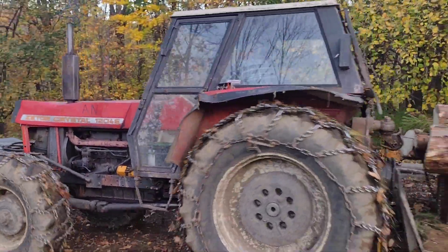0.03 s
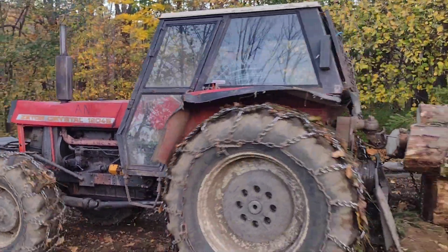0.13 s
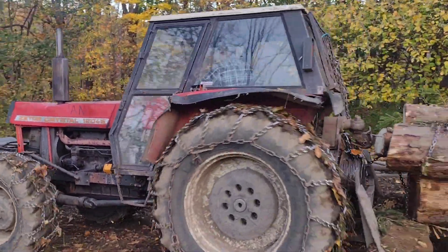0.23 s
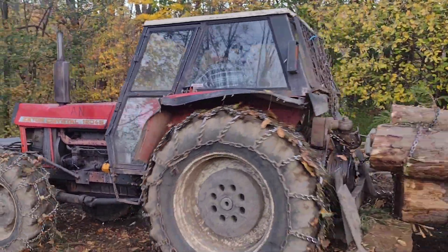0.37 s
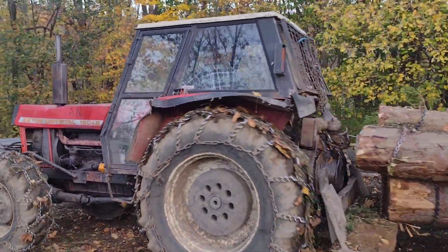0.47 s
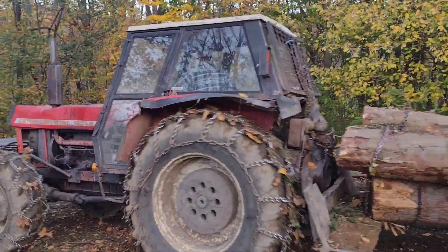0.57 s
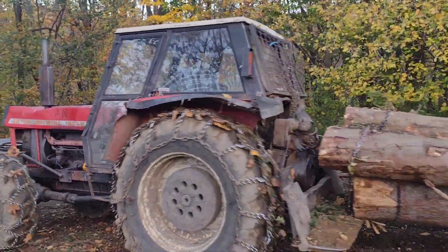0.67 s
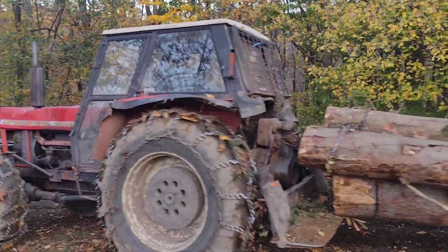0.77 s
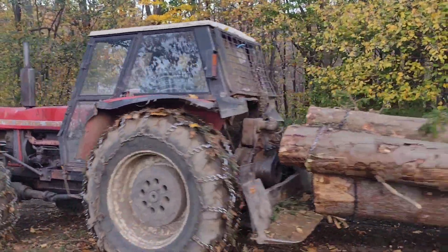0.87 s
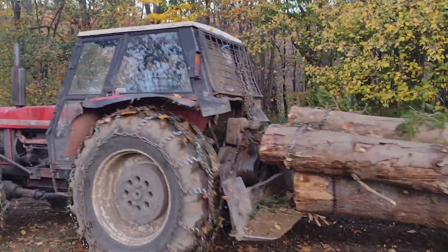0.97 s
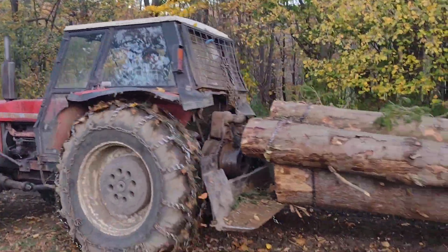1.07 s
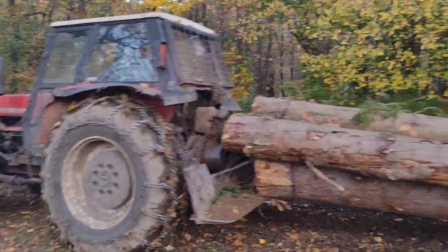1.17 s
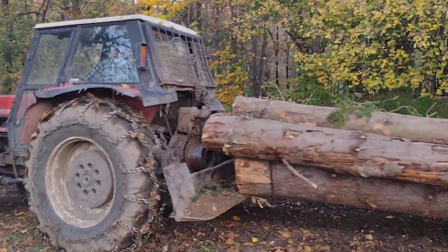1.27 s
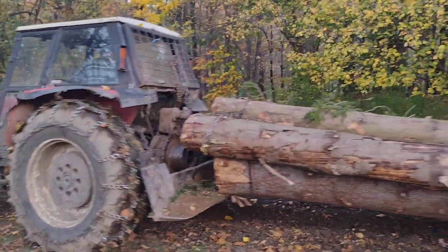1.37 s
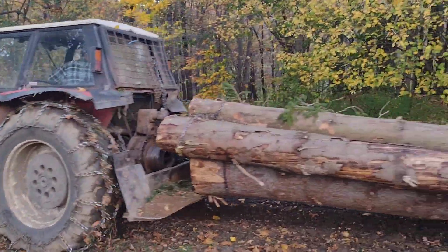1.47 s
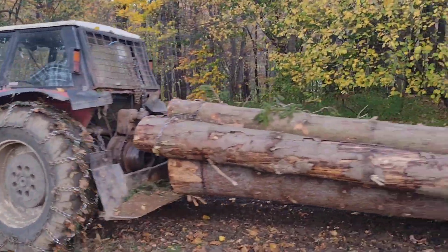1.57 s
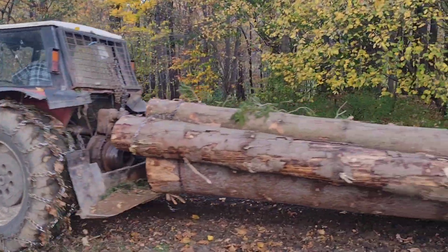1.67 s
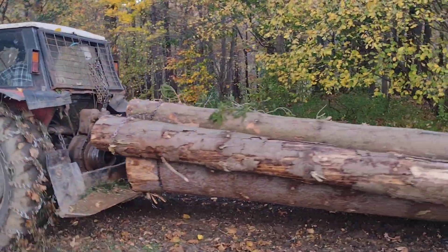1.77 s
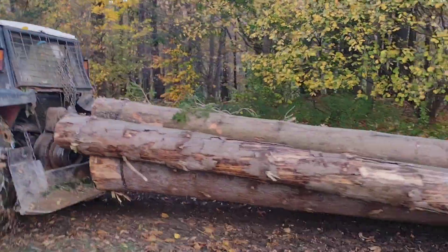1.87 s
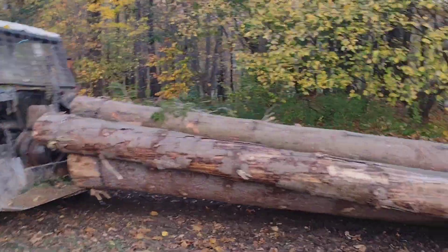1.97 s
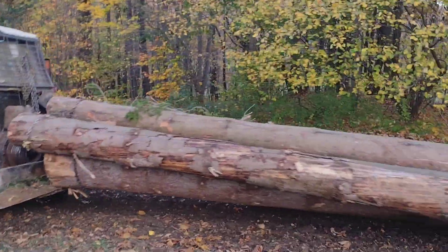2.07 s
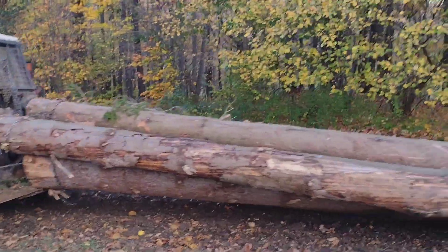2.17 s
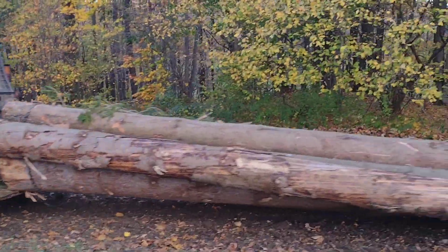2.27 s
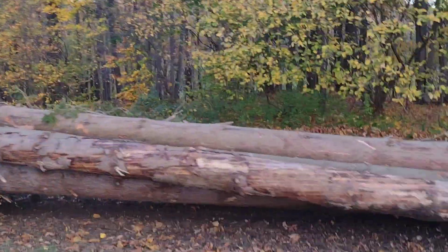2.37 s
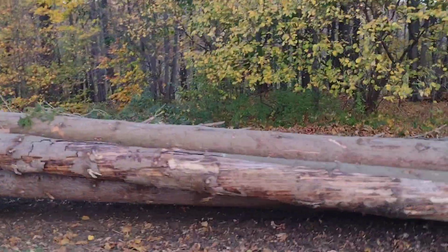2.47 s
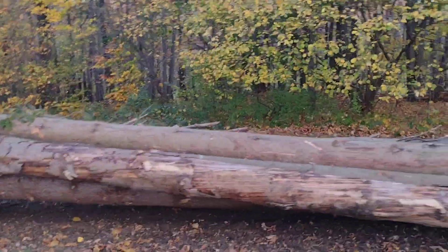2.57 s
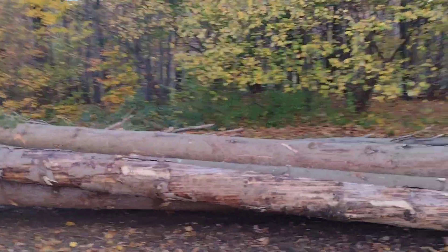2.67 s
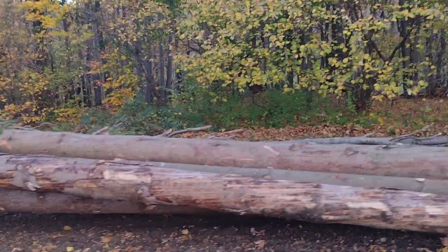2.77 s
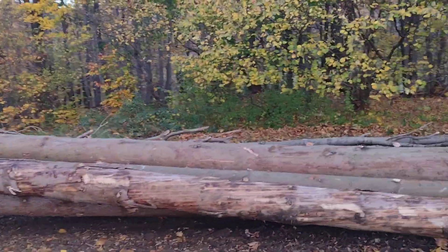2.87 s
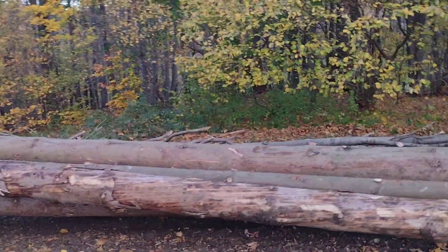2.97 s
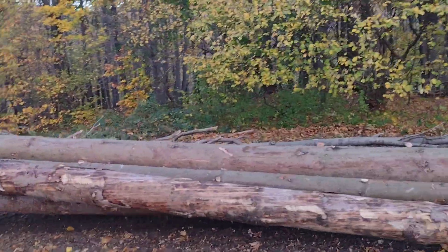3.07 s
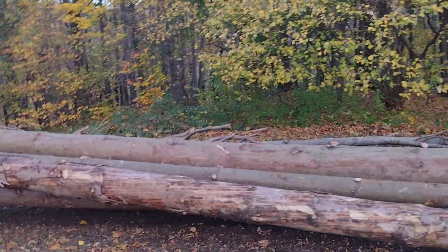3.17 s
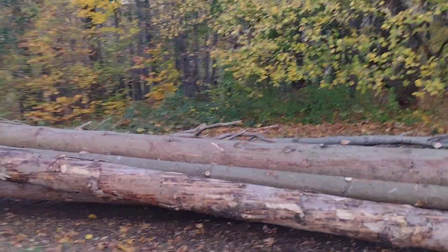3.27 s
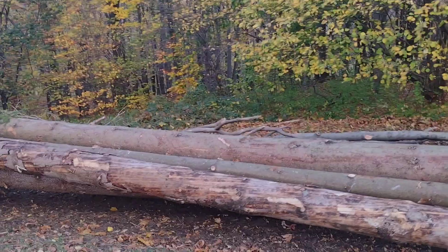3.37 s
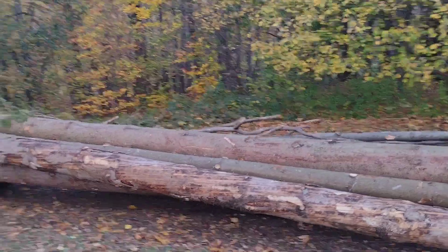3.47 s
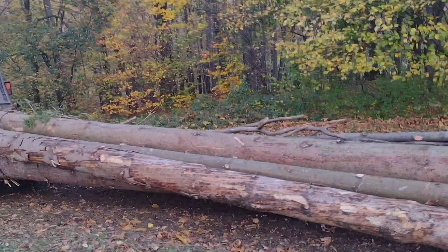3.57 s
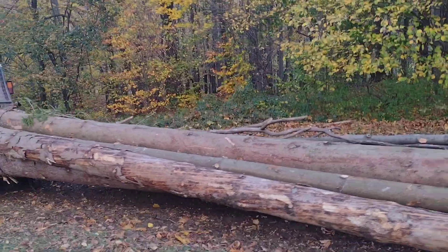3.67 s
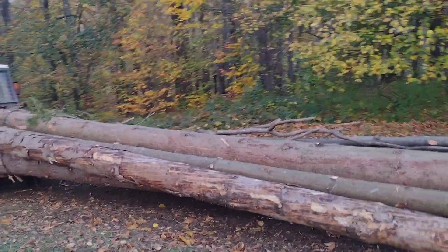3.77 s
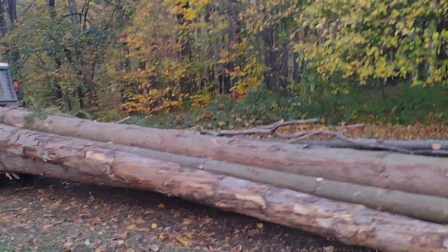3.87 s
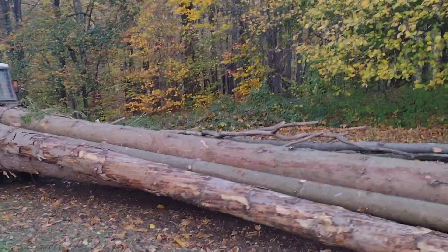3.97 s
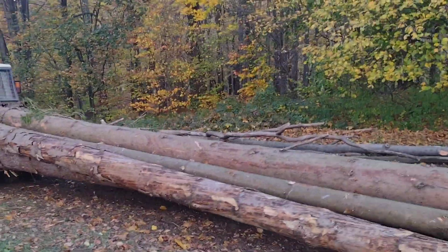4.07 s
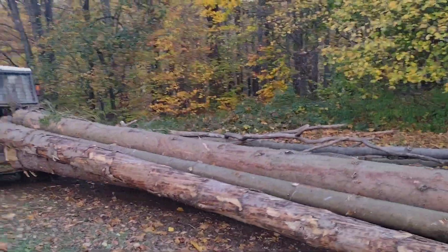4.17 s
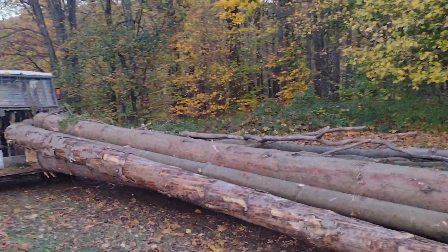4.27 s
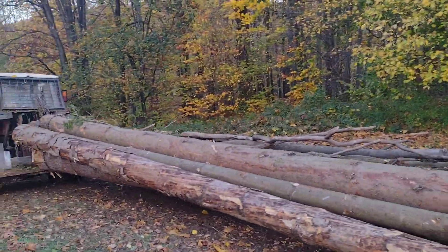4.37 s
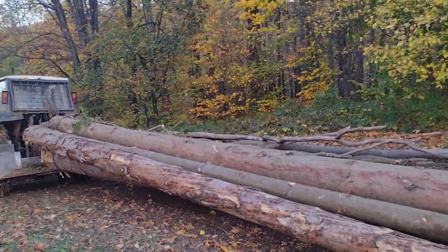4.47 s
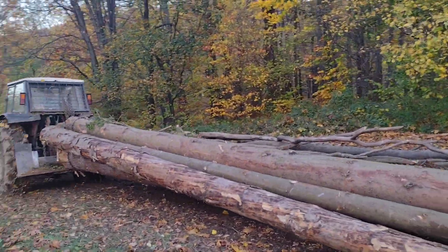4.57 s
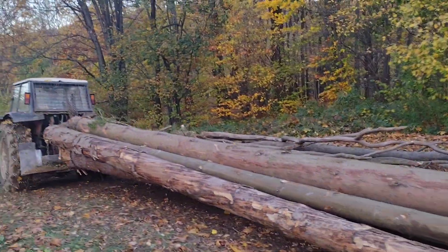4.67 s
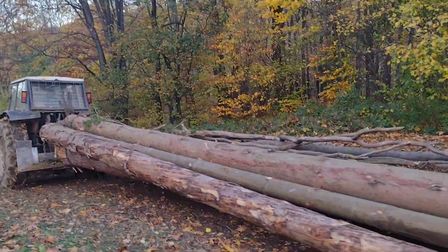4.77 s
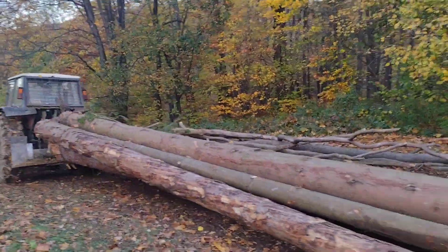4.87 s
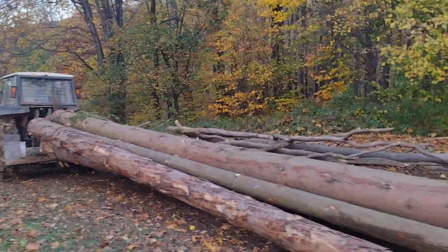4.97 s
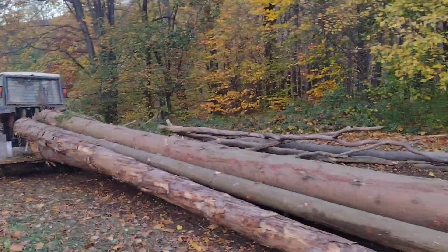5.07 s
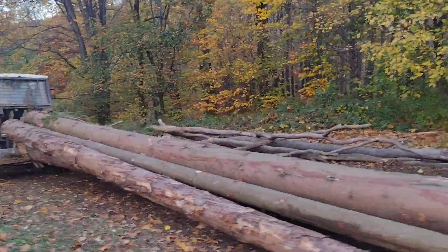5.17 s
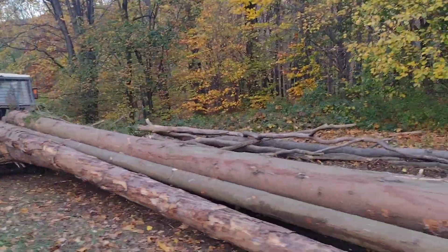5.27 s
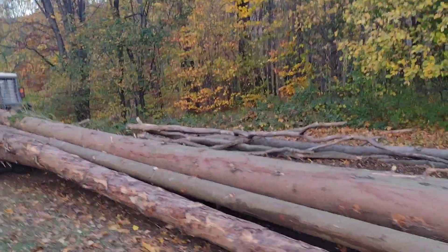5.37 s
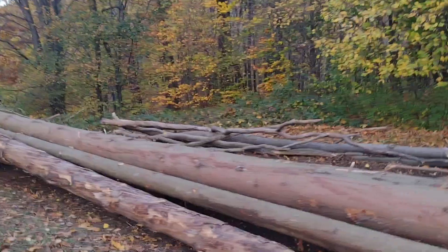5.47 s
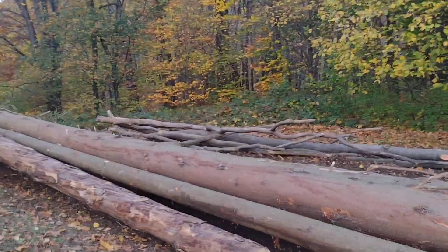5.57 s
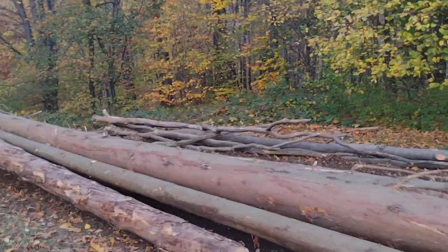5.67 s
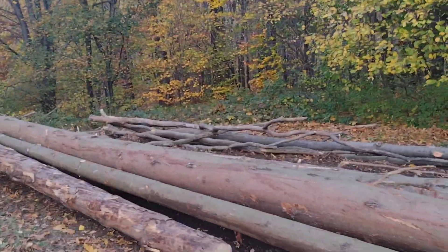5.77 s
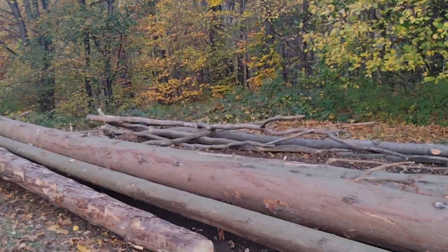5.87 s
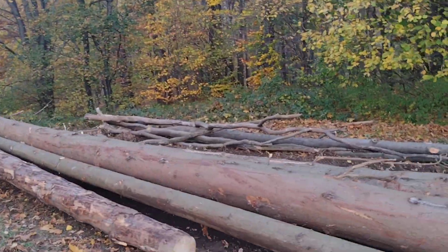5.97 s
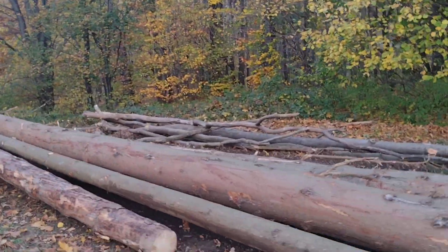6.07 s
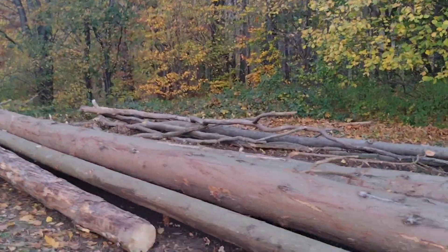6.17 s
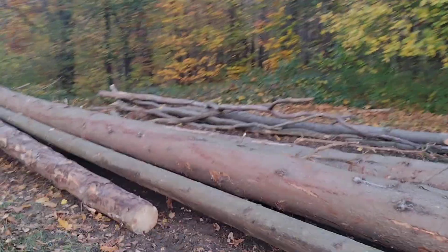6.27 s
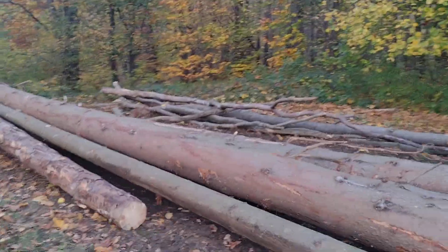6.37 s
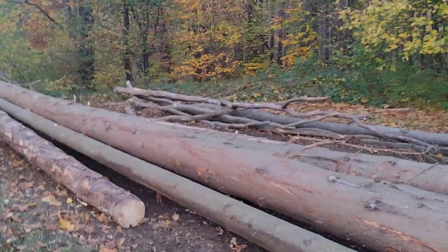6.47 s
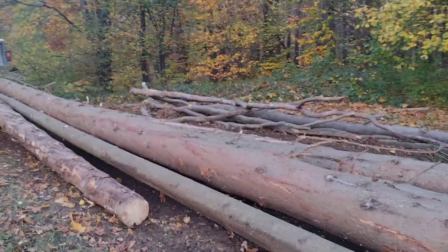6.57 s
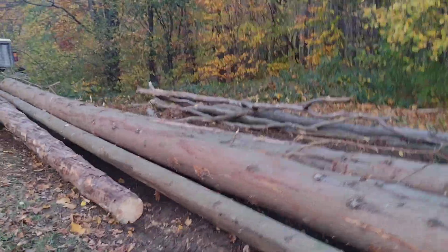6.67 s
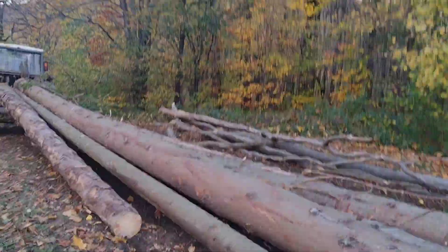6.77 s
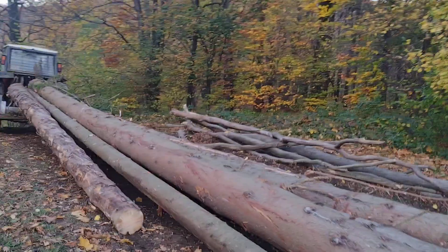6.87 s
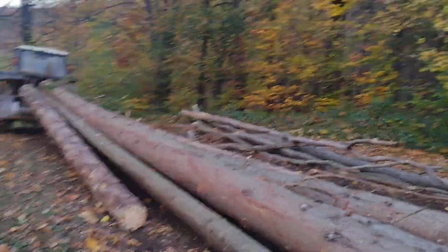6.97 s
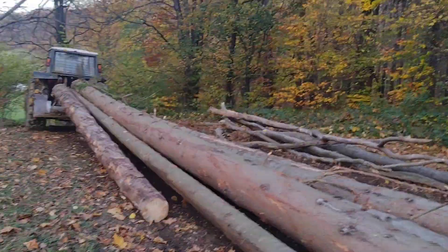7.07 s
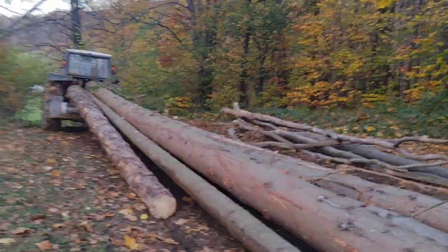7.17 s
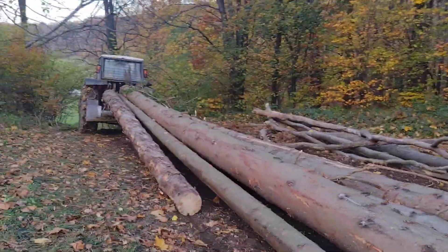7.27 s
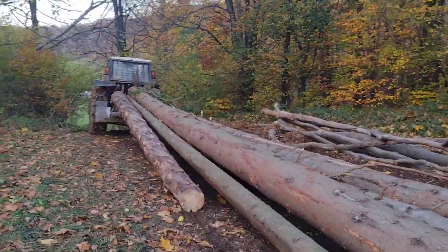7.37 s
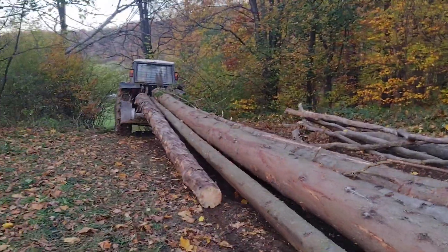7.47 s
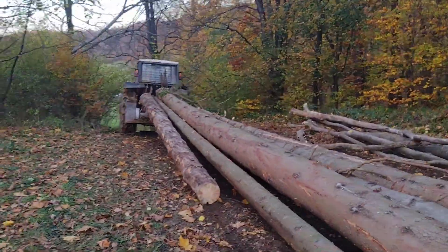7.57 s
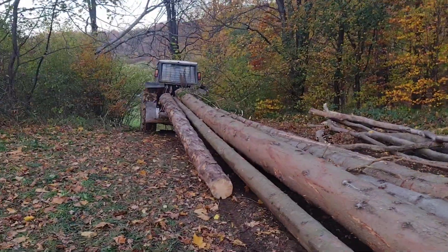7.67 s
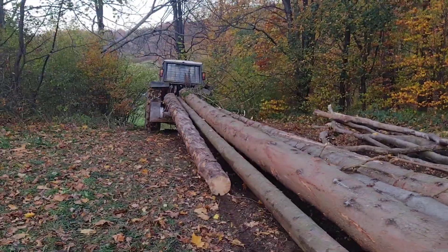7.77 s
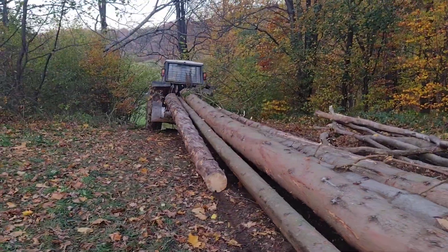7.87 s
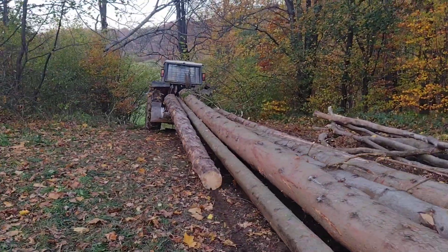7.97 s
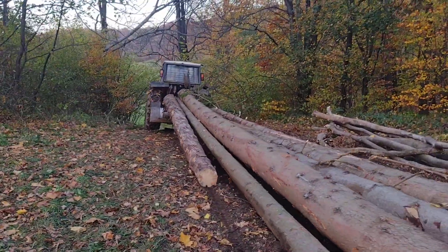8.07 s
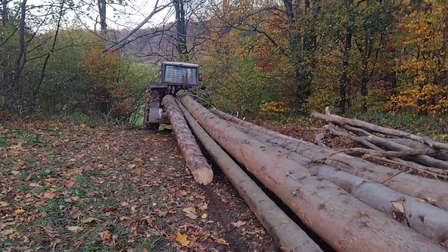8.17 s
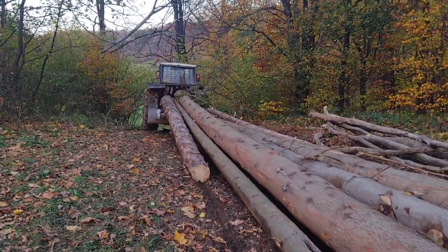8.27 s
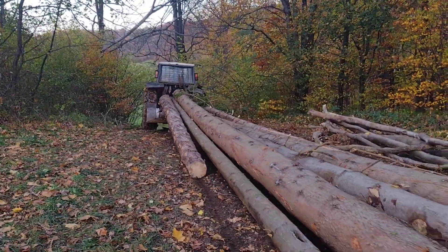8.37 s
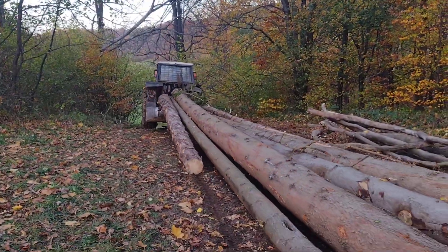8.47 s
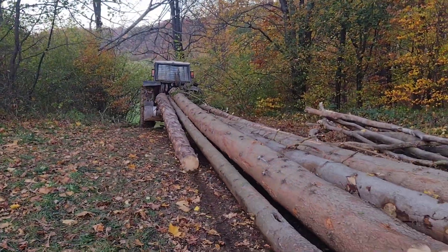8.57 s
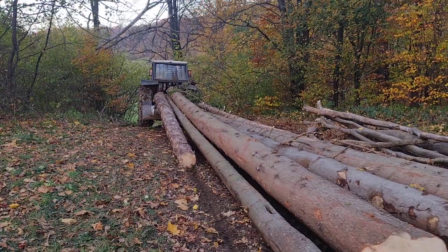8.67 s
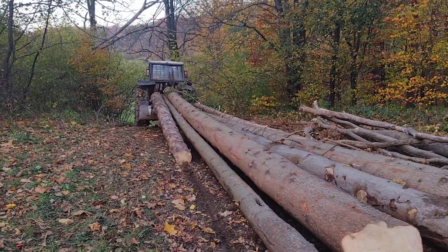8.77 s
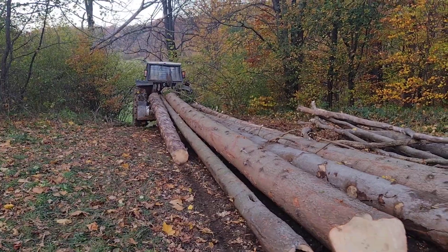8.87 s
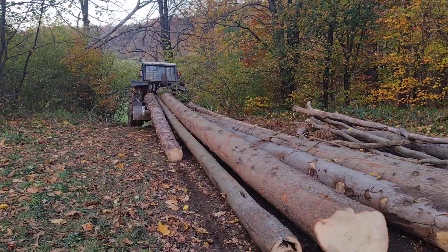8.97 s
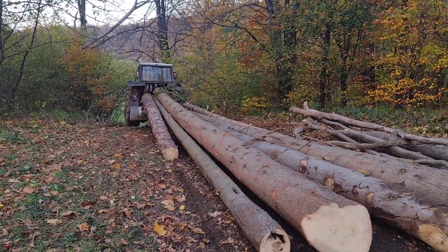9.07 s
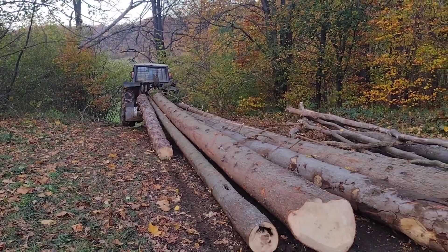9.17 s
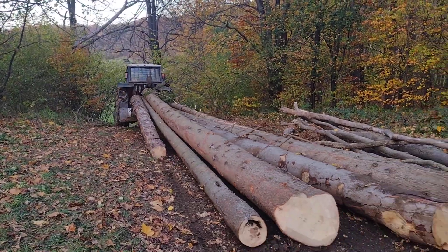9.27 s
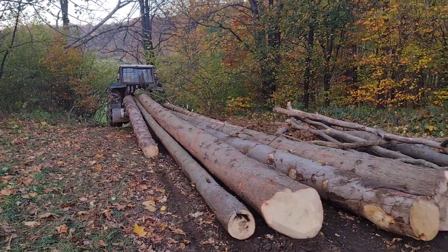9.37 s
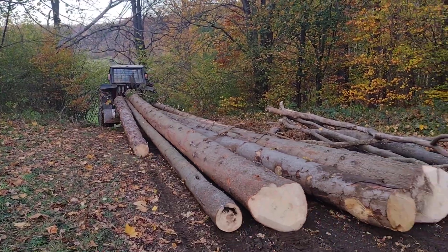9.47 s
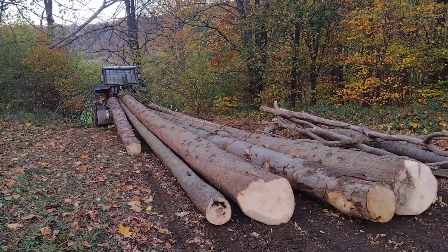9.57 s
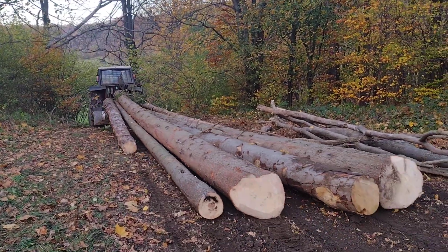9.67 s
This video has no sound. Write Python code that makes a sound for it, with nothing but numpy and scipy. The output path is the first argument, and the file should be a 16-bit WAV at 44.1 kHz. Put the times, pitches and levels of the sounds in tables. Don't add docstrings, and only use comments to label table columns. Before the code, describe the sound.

Close throbbing diesel clatter over a steady low hum, chain links clinking, logs hissing over dry leaves, the engine gradually growing softer and duller.

```python
import sys
import numpy as np
from scipy import signal
from scipy.fft import rfft, irfft, next_fast_len
from scipy.io import wavfile
from scipy.ndimage import uniform_filter1d, map_coordinates

SR = 44100
rng = np.random.default_rng(int(sys.argv[2]) if len(sys.argv) > 2 else 0)


def rack_gain(trim_db):
    fader = np.asarray(trim_db, float)
    return 10 ** (fader / 20)


def materialize(psi):
    bounded = np.clip(np.atleast_2d(psi).T, -1, 1)
    quanta = np.round(bounded * 32767).astype(np.int16)
    wavfile.write(sys.argv[1], SR, quanta)


N = 429093

# (time [s], firing rate [Hz])
SPEED = [(0.0, 76.63), (0.39, 68.88), (0.8, 67.5), (1.03, 65.55), (1.87, 63.71), (2.05, 64.85),
         (2.9, 65.84), (3.04, 63.7), (3.28, 66.33), (4.25, 67.14), (4.78, 62.7), (5.8, 60.44),
         (6.93, 60.15), (7.16, 63.35), (7.62, 61.64), (8.07, 63.38), (8.63, 62.32), (9.19, 66.83)]
CYLINDERS = [4, -1, 3.5, -3.5, 3, 2.5]


def unit(x):
    return x / np.sqrt(np.mean(x ** 2) + 1e-20)


def along(points, hz):
    f, v = np.transpose(points)
    return np.interp(np.log(hz + 1), np.log(f + 1), v)


def curves(rows):
    s, *cols = np.transpose(rows)
    return [np.interp(np.arange(N) / SR, s, c) for c in cols]


def wobble(rate):
    coarse = np.arange(0, N + 64, 64)
    knots = map_coordinates(rng.standard_normal(int(N * rate / SR) + 4), [coarse * rate / SR])
    return np.interp(np.arange(N), coarse, knots)


def bump(x, centre, half):
    return np.exp(-((x - centre) / half) ** 2)


def filtered(x, response):
    m = next_fast_len(N + SR // 2)
    return irfft(rfft(x, m) * response(np.fft.rfftfreq(m, 1 / SR)), m)[..., :N]


def resonance(hz, width_hz):
    return lambda f: 1j * f * width_hz / (hz * hz - f * f + 1j * f * width_hz)


def rush(spectrum, patchy_db, repeating=0):
    z = signal.stft(rng.standard_normal((3, N)) + repeating, nperseg=512)[2]
    field = rng.standard_normal(z.shape[1:])
    field = uniform_filter1d(uniform_filter1d(field, 6, 0), 10, 1)
    x = signal.istft(z * rack_gain(patchy_db * unit(field)), nperseg=512)[1][:, :N]
    return unit(filtered(x, lambda hz: rack_gain(along(spectrum, hz))))


def snap(hz, width_hz, rise_s):
    u = np.arange(2048) / SR
    clean = .4 * min(1500 / width_hz, 1) ** 2
    burst = clean + rng.standard_normal(len(u))
    burst = burst * u * np.exp(-u / rise_s) * np.cos(2 * np.pi * hz * u)
    x = irfft(rfft(burst) * resonance(hz, width_hz)(np.fft.rfftfreq(len(u), 1 / SR)) ** 2)
    return x / np.abs(x).max()


def ports(trio, direct, lag_share):
    # (time [s], lag [samples])
    port_lag = [(0, 15), (1, 19.3), (2, 24.7), (3, 26.2), (4, 20.5), (4.5, 20.3), (5.5, 22.5), (6.5, 23.5),
                (7.2, 17.3), (7.7, 6.7), (8.5, 5.12), (9.73, 12)]
    late = np.arange(N) - lag_share * curves(port_lag)[0]
    direct = np.clip(direct, 0, 1)
    both = np.array([trio[0], map_coordinates(trio[0], [late], order=3, mode="nearest")])
    return np.sqrt(direct) * both + np.sqrt(1 - direct) * trio[1:]


def load():
    easy_hz, heavy_hz = 65.5, 60
    return np.clip((easy_hz - curves(SPEED)[0]) / (easy_hz - heavy_hz), 0, 1.2)


def passing_db(nearest_s, nearest_m, db, load_db, loss_db_per_m):
    track_m_per_s = 1.5
    r = np.hypot(nearest_m, track_m_per_s * (np.arange(N) / SR - nearest_s))
    spread_db = 20 * np.log10(r / nearest_m)
    return db - spread_db + load_db * load() - loss_db_per_m * (r - nearest_m)


def gears(firings):
    # (order of the cycle, start [s], end
    # [s], level [dB])
    meshes = [(38.65, 1.1, 3.17, -43), (31.9, 1.3, 2.2, -43), (15, 6.2, 8.3, -47.5),
              (15.9, 5.4, 7.2, -48.5), (12.14, 1.1, 1.94, -38.5), (33.3, 4.6, 7, -49.5),
              (25, 7, 7.6, -43.5), (23.8, 1, 2.3, -42.5), (29.9, 1.2, 3, -48), (18, .5, 1.3, -54),
              (18.1, 3.7, 3.75, -45), (26, 8.6, 9, -48.5)]
    # (time [s], frequency [Hz], level [dB])
    winch = [
        (4.9, 574, -70),
        (5.1, 560, -46),
        (5.55, 517, -52),
        (5.95, 554, -48),
        (6.2, 555, -64),
    ]
    t = np.arange(N) / SR
    winch_hz, winch_db = curves(winch)
    x = rack_gain(winch_db) * np.cos(2 * np.pi * np.cumsum(winch_hz) / SR + 1.8 * wobble(15))
    for order, start, end, db in meshes:
        heard = np.clip(np.minimum(t - start, end - t) / 0.14, 0, 1)
        level = heard * rack_gain(db + 4.2 * wobble(2.09))
        x += level * np.cos(2 * np.pi * order * firings / len(CYLINDERS) + 0.47 * wobble(8))
    return ports(np.array([x, x, x]), 0.92, lag_share=0.67)


def logs():
    # (frequency [Hz], level [dB per Hz])
    leaves = [(900, -55), (1600, -3), (2700, 3), (3400, -2), (4300, 1), (5400, -4.5), (6800, 0), (9000, 0),
              (11500, -11), (15600, -21.5)]
    # (frequency [Hz], level [dB per Hz])
    heap_colour = [(710, -40), (1200, 2), (1540, -8), (2010, 1.5), (2710, -3), (4680, -4), (5500, -11),
                   (9100, 1), (15600, -31)]
    # (time [s], half length [s], level [dB], brightness [steps of 5.6 dB])
    lurches = [(.47, 0.0133, -59, 8), (1.07, 0.02, -43, 5.5), (1.845, 0.092, -61, 9),
               (3.097, 0.055, -57, 8), (3.663, 0.098, -42, 4.5), (4.25, 0.031, -33, 1),
               (5.226, 0.015, -54, 6.5), (5.313, 0.091, -41, 3), (6.138, 0.028, -46, 5.5),
               (6.856, 0.018, -39, 5), (7.328, .04, -44.5, 2.5), (7.87, 0.078, -37.5, 3),
               (4.5, .04, -62, 6), (4.586, 0.027, -61, 7), (9.356, 0.048, -54, 3)]
    # (time [s], peak level [dB], frequency [Hz], width [Hz])
    twigs = [(1.056, -26, 10670, 100), (.272, -23, 3000, 400), (.305, -30, 14800, 150),
             (.375, -24, 11300, 4000), (.462, -21, 11500, 3000), (4.233, -23, 5000, 6000),
             (4.247, -28, 3500, 4000), (4.235, -20, 895, 1400), (4.242, -23, 330, 450),
             (4.242, -24, 820, 500), (4.238, -23, 1900, 1800), (4.254, -30, 11000, 5000),
             (4.44, -31, 10000, 5000), (4.356, -24, 6500, 6000), (4.482, -32, 12500, 4000),
             (4.516, -18, 9050, 3000), (4.518, -36, 14500, 2000), (4.517, -30, 10800, 1200),
             (4.609, -28, 9700, 1500), (4.622, -38, 14400, 500), (4.79, -38, 14000, 4000),
             (5.218, -21, 9250, 2500), (5.445, -27, 9000, 5000), (5.81, -27, 7400, 2500),
             (5.909, -27, 4300, 2500), (6.09, -24, 9460, 2500), (8.388, -40, 14400, 300),
             (8.397, -31.5, 9000, 5000), (8.738, -39, 11000, 3000), (9.02, -43, 13000, 4050),
             (9.17, -38, 6500, 2000), (9.275, -43, 8000, 3000), (9.37, -42, 14000, 3000)]
    t = np.arange(N) / SR
    drag_db = passing_db(nearest_s=0.92, nearest_m=3, db=-30, load_db=2, loss_db_per_m=0.38)
    x = rack_gain(drag_db + 1.5 + .8 * wobble(8.1)) * rush(leaves, patchy_db=2.5)[1:]
    heap = rush(heap_colour, patchy_db=1.8)[1:] * rack_gain(1.7 * wobble(120))
    bright = unit(filtered(heap, lambda hz: (hz / 8000) ** 2))
    for s, half, db, tilt_db in lurches:
        at = slice(max(round((s - 4 * half) * SR), 0), round((s + 4 * half) * SR))
        swell = rack_gain(db) * np.exp(-np.abs((t[at] - s) / half) ** 3)
        x[:, at] += swell * (heap[:, at] + rack_gain(5.6 * tilt_db - 19.0) * bright[:, at])
    for s, db, hz, width_hz in twigs:
        twig = snap(hz, width_hz, 0.0019)
        x[:, round(s * SR):][:, :len(twig)] += rack_gain(db) * twig
    return x


def chain():
    # (frequency [Hz], level [dB], t60 [s])
    link = [(6551, -4, .25), (6683, -12, .3), (6966, 0, .21), (6990, -8, .3), (7125, -8, .5),
            (7670, -16, .2), (10050, -25, .1), (12750, -5, .1), (12820, -12, .3), (12845, -14, .3),
            (14300, -26, .25), (14340, -27, .25), (14760, -25, .15)]
    # (time [s], level [dB], favoured frequency [Hz], upper modes [dB], ring share [0-1])
    clinks = [(0.228, -4, 10050, -59, 1), (.262, -31, 6970, -25, 1), (.293, -23, 6900, -20, 0.8),
              (.31, -18, 7200, -3, 0.4), (2.2, -33, 6850, -35, 1), (2.25, -23, 6850, -35, .8),
              (2.895, -8, 10050, -54, 1), (3.833, -18, 6730, -25, 0.24), (4.498, -36, 6970, -14, 0.4),
              (4.61, -19.5, 6640, 4, 0.44), (4.622, -27, 6700, -12, 0.4), (4.64, -29, 6960, -14, 0.56),
              (5.08, -46, 6970, 0, 1), (5.54, -37, 6740, -10, 1), (6.2, -31, 7120, -10, 0.27),
              (6.515, -35, 6680, -12, .6), (6.667, -21, 6850, -1.5, 1), (6.755, -30.5, 6970, -4, 0.96),
              (6.984, -34, 7120, -8.5, .6), (7.19, -44, 6540, -3, 0.6), (8.345, -37, 7000, -7, .5),
              (8.386, -31.5, 7000, 0, 0.7), (8.397, -27, 7200, -7.5, 0.37), (8.69, -39, 6740, -5, 0.9),
              (8.735, -39, 6900, -1, 0.3), (8.84, -44, 7050, -10, 1), (8.92, -46, 7000, -3, 0.5)]
    x, t = np.zeros(N + SR), np.arange(SR // 2) / SR
    for s, db, favoured_hz, upper_db, share in clinks:
        chance = rng.standard_normal((len(link), 2))
        ring = .7 * rack_gain(min(upper_db, 0) - 60 * t / .006) * rng.standard_normal(len(t))
        for (hz, level_db, t60), (a, b) in zip(link, chance):
            lift_db = upper_db if hz > 11000 else -14 * min(abs(hz - favoured_hz) / 500, 2.5)
            decay = rack_gain(level_db + lift_db + 2 * a - 60 * t / (t60 * share))
            ring += decay * np.sin(2 * np.pi * hz * t + b * 3)
        x[round(s * SR):][:len(t)] += rack_gain(db) * ring * (1 - np.exp(-t / 0.00041))
    return ports(np.tile(x[:N], (3, 1)), 0.61, lag_share=0.86) * rack_gain([[-1.5], [1.5]])


def cycle_pattern(firings):
    patterns = rng.standard_normal((24, 4096))
    turn = firings / len(CYLINDERS) % 1 * (patterns.shape[1] - 1)
    return map_coordinates(patterns, [np.linspace(0, len(patterns) - 1, N), turn], order=1)


def block(firings):
    # (frequency [Hz], level [dB per Hz])
    roar_beside = [(160, -3.5), (250, -1.5), (350, -6.5), (630, 3), (900, -8), (1200, 0), (1450, -7.5),
                   (2400, -13), (4000, -90)]
    roar_passing = [(160, 0), (330, 2.5), (480, -5.5), (620, 1.5), (720, 3.5), (1000, -4.5), (1300, -2),
                    (2400, -22), (4000, -92.5)]
    roar_behind = [(160, 4), (250, 1), (380, 1), (520, -6), (700, 1), (1000, -4.5), (1300, -3), (2400, -21),
                   (4000, -90)]
    roar_far = [(160, 6), (250, 3.5), (380, -4.5), (530, 0.5), (750, -6.5), (1000, -4.5), (1300, -11),
                (2400, -14.5), (4000, -88)]
    # (frequency [Hz], gain [dB])
    sub = [(18, -12), (40, -5), (120, -6), (220, 0)]
    # (frequency [Hz], level [dB per Hz])
    whirr_colour = [(700, -35), (1400, -12), (1650, -1.5), (1900, -7.5), (2090, 3), (2280, -4), (2900, -2),
                    (3700, -6.5), (4900, -11), (5700, -28), (7200, -13), (9500, -6.5), (11500, -17),
                    (15600, -49)]
    t = np.arange(N) / SR
    roar_db = passing_db(nearest_s=0.4, nearest_m=1.83, db=-23, load_db=-0.46, loss_db_per_m=-0.32)
    whirr_db = passing_db(nearest_s=0.78, nearest_m=2.5, db=-28, load_db=2.5, loss_db_per_m=0.5)
    beside = np.clip(1.5 - t / 0.62, 0, 1)
    behind = np.clip((t - 2.11) / .9, 0, 1)
    far = np.clip((t - 6.2) / 1.46, 0, 1)
    shares = beside, np.abs(1 - beside - behind), np.abs(behind - far), far
    colours = roar_beside, roar_passing, roar_behind, roar_far
    habit = .9 * cycle_pattern(firings)
    body = sum(np.sqrt(share) * rush(colour, 0.35, habit) for share, colour in zip(shares, colours))
    body = filtered(body, lambda hz: rack_gain(along(sub, hz)))
    roar_db = roar_db - 2.0 + 4 * bump(t, 0.23, 0.12)
    roar_db = roar_db + 0.85 * np.cos(2 * np.pi * (firings - .35))
    roar = rack_gain(roar_db) * ports(body, .88 - 0.0022 * t, lag_share=0.66)
    whirr_db = whirr_db - 3.5 + 2.0 * np.cos(2 * np.pi * (firings - .3))
    whirr = rack_gain(whirr_db) * ports(rush(whirr_colour, patchy_db=0.87), 0.42, lag_share=1.0)
    return roar + whirr


def knock(firings):
    # (frequency [Hz], width [Hz], level [dB], group)
    panels = [(3580, 1500, 0.5, "bonnet"), (2164, 490, -9.5, "bonnet"), (5010, 1570, 2, "cab"),
              (7400, 2350, 2.5, "guard"), (8900, 2100, -3, "grille"), (10250, 680, -11, "grille"),
              (13000, 3000, -26, "grille")]
    # (time [s], level [dB])
    shaking = [(0, -38), (.3, -42), (.9, -39), (2.5, -38), (3.2, -42.5), (3.5, -40.5), (3.8, -52),
               (5.5, -57), (6.5, -50.5)]
    # (time [s], half length [s], level [dB], group)
    facing = [(0, 0.22, 7.5, "cab"), (-1.5, .2, 8, "guard"), (0, 0.25, 11, "grille"),
              (-3, .35, 4, "grille"), (1.3, 0.18, 4, "guard"), (-0.9, 0.25, 9.5, "bonnet"),
              (0, .3, 1, "guard"), (1.9, 0.25, 11.5, "grille"), (2.2, 0.16, 4, "cab"),
              (2.5, 0.31, 7, "bonnet"), (2.5, 0.15, 5.5, "cab"), (2, 0.098, -6.5, "cab"),
              (0.2, .4, -7, "bonnet"), (2, .13, 5, "bonnet"), (2, 0.09, -6, "bonnet"),
              (1.0, .3, 2.5, "cab"), (.55, .15, -4.5, "guard"), (1.5, .3, 5, "guard"),
              (3, 0.26, 9, "grille"), (2.952, 0.4, 2.5, "guard"), (3.043, 0.11, 12, "grille"),
              (0.5, 0.13, 2, "grille"), (3.3, 0.25, 0.5, "bonnet"), (5.5, 0.38, -1, "cab"),
              (4.6, .6, 2.5, "grille"), (6.5, 0.66, 4.5, "guard")]
    t = np.arange(N) / SR
    stroke = firings + .06
    which = np.floor(stroke).astype(int) + 1
    after = stroke % 1 / curves(SPEED)[0] / .0023
    strength = rack_gain(np.array(CYLINDERS)[(which - 1) % len(CYLINDERS)])
    puff = unit((0.013 + after ** 3 * np.exp(-3 * after)) * strength)
    luck = np.tanh(rng.standard_normal((which.max() + 1, len(panels) + 1)))
    far_loss_db = 4 * np.clip(t - 6.5, 0, None)
    group_db = {row[-1]: curves(shaking)[0] - far_loss_db for row in panels}
    for s, half, db, group in facing:
        group_db[group] += db * bump(t, s, half)
    x = 0
    for k, (hz, width_hz, db, group) in enumerate(panels):
        size = rack_gain(db + group_db[group] + 1.4 * luck[which, k] + .6 * luck[which, -1])
        ring = resonance(hz, width_hz)
        lag = round(k % 3 * .0012 * SR)
        force = np.roll(size * puff, lag) * rng.standard_normal((3, N))
        x = x + filtered(force, lambda f: ring(f) ** 2 * np.sqrt(SR / width_hz))
    return rack_gain(-0.5) * ports(x, 0.63, lag_share=0.9)


def hard_knocks():
    # (time [s], peak level [dB], frequency [Hz])
    hard = [(0.0298, -15, 7100), (0.0822, -12, 9770), (0.109, -15, 8600), (0.7377, -13, 4810),
            (0.7976, -12, 7300), (0.844, -12, 8500), (0.8874, -10, 7630), (0.9178, -13, 8200),
            (0.9462, -13, 4840), (1.069, -14, 7440), (1.0994, -18, 5100), (1.1608, -17, 6610),
            (1.1917, -12, 4270), (1.223, -11, 7730), (1.2531, -10, 7460), (1.2835, -10, 4200),
            (1.3139, -17, 8900), (1.3448, -11, 7500), (1.4371, -21, 4610), (1.5296, -11, 4680),
            (1.5614, -8, 9080), (1.5913, -13, 9200), (1.6237, -12, 8600), (1.6531, -14, 9220),
            (1.6851, -16, 8000), (1.718, -9, 8900), (1.8106, -5, 8830), (1.9046, -7, 8540),
            (1.9365, -14, 8300), (1.9679, -25, 4130), (1.9984, -13, 8600), (2.0453, -14, 7680),
            (2.0906, -9, 7810), (2.153, -11, 8610), (2.1844, -16, 7840), (2.2438, -20, 6940),
            (2.2757, -9, 3550), (2.3062, -15, 3780), (2.3366, -11, 5150), (2.3675, -8, 3130),
            (2.3974, -11, 3930), (2.4598, -13, 7620), (2.4902, -11, 5150), (2.5366, -11, 3700),
            (2.584, -12, 5130), (2.6449, -11, 7460), (2.6738, -15, 5180), (2.7362, -12, 7640),
            (2.8265, -13, 7500), (2.8868, -21, 3460), (3.0106, -12, 7570), (3.0415, -15, 8000),
            (3.1048, -7, 8350), (3.1274, -8, 9050), (3.1966, -17, 8210), (3.2266, -16, 3900),
            (3.3336, -11, 8280), (3.3782, -11, 7400), (3.437, -16, 8500), (3.5284, -14, 8080)]
    x = np.zeros((3, N))
    for s, db, hz in hard:
        hit = np.array([snap(hz, 2000, 0.0013) + rack_gain(-5) * snap(6020, 7000, 0.00059) for port in x])
        x[:, round(s * SR):][:, :hit.shape[1]] += rack_gain(db - 5) * hit
    return ports(x, 0.43, lag_share=0.917)


def exhaust(firings):
    # (time [s], level [dB])
    tone = [(0, -16), (.3, -17.5), (1, -16), (1.5, -16.5), (2.5, -15.5), (3.05, -16), (3.2, -18),
            (3.3, -16), (4.2, -19), (4.5, -21.5), (5, -21), (6, -22.5), (7, -22), (7.2, -24), (7.5, -23.5),
            (8.6, -24.5), (9, -26.5), (9.73, -28.5)]
    # (order, level against the firing tone [dB], phase [rad])
    uneven = [(3, -36, 0), (4, -27, 4), (5, -29.5, 0.5), (7, -20.5, 1.2), (8, -27, -0.6), (10, -31, -0.5),
              (11, -32, 2.5), (14, -34.5, 0), (15, -34.5, 0.9), (16, -35.5, -2.2), (17, -36.5, -0.2),
              (19, -44.5, -3)]
    t, speed_hz, tone_db = np.arange(N) / SR, *curves(SPEED), *curves(tone)
    cycle = 2 * np.pi * firings / 6
    firing = len(CYLINDERS) * cycle
    hum = np.cos(firing) * rack_gain(0.46 * wobble(13))
    hum += rack_gain(-20 + 8.5 * load() + wobble(4.12)) * np.cos(firing + firing / 2 + .5)
    stack_db = 11 * bump(2 * speed_hz, 139.3, 3.8)
    second = rack_gain(-15.5 + stack_db + 1.2 * wobble(2.8))
    echo_keeps = 0.18
    echo = (np.tanh((t - 3.33) / 1.8) - echo_keeps) / (1 + echo_keeps)
    second_rad = np.interp(echo, [-.2, .2], [-1.1, -2.7])
    hum += second * np.hypot(echo, .12) * np.cos(2 * firing + second_rad)
    third_db = -36 + 4 * load() + 14.5 * bump(t, 7.37, 2.8)
    hum += rack_gain(third_db + 2.7 * wobble(6)) * np.cos(firing + 2 * firing + 0.51 + 0.62 * wobble(9))
    lumps = 0
    for order, db, turn in uneven:
        level = rack_gain(db + 1.5 * wobble(3))
        lumps = lumps + level * np.cos(round(order) * cycle + turn + .2 * wobble(2))
    x = np.sqrt(2) * rack_gain(tone_db) * (hum + rack_gain(3.5) * lumps)
    return rack_gain([[.6], [-.2]]) * ports(np.array([x, x, x]), 1, lag_share=0.49)


def scene():
    firings = -.085 + np.cumsum(curves(SPEED)[0]) / SR
    engine = exhaust(firings) + block(firings) + gears(firings) + knock(firings) + hard_knocks()
    return engine + logs() + chain()


def low_pass(x):
    return signal.sosfilt(signal.butter(12, 15700, fs=SR, output="sos"), x)


def record(dry):
    # (frequency [Hz], left minus right [dB])
    port_shade = [(60, 0), (300, -0.7), (700, -1), (1400, -4), (2500, -4), (5000, -6), (8000, -2.5),
                  (14000, -0.5)]
    halves = [[.5], [-.5]]
    shaded = filtered(dry, lambda hz: rack_gain(along(port_shade, hz) * halves) * (hz < 15750))
    return low_pass(shaded)


dry = scene()
out = record(dry)
materialize(out)
```